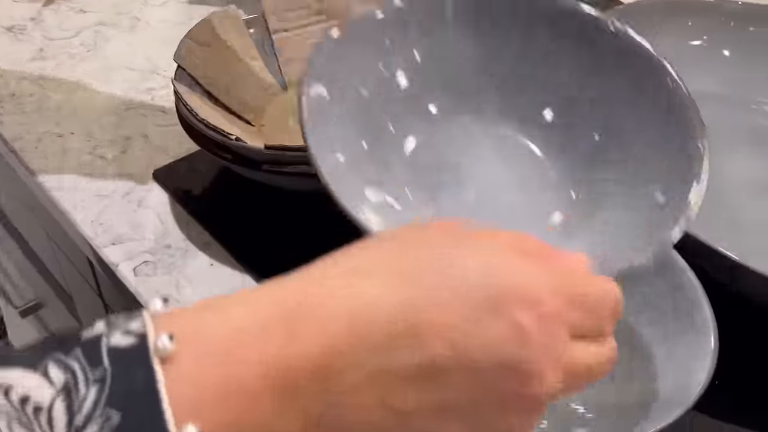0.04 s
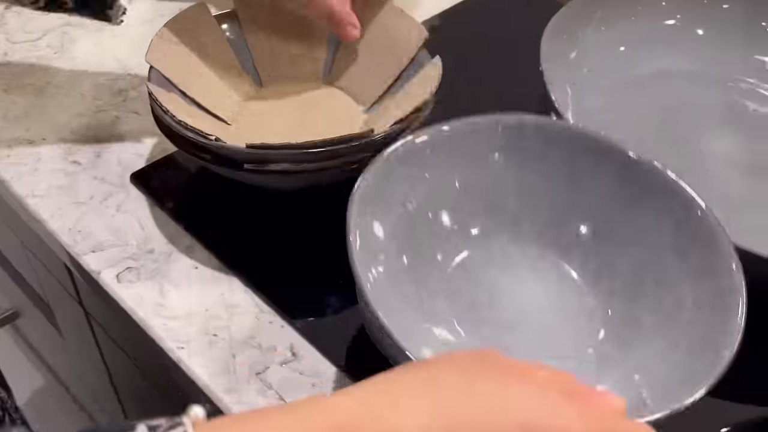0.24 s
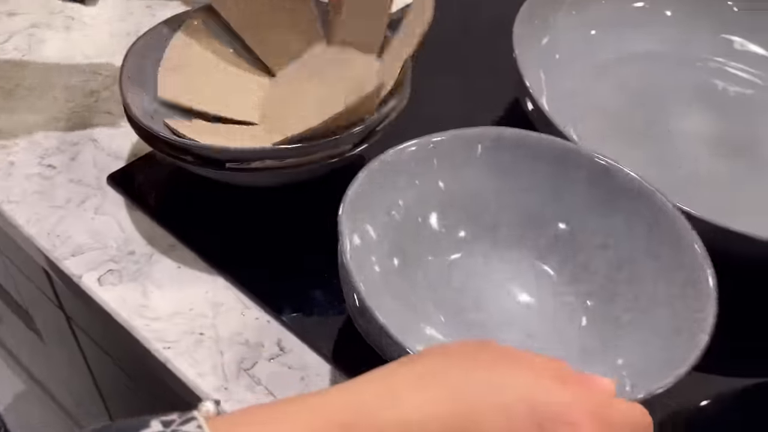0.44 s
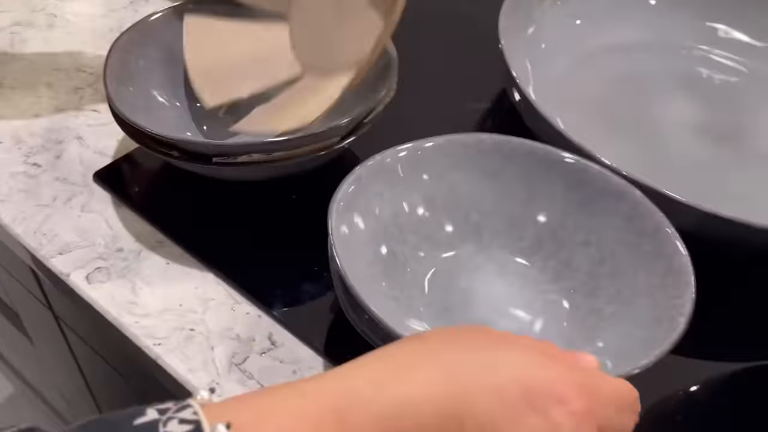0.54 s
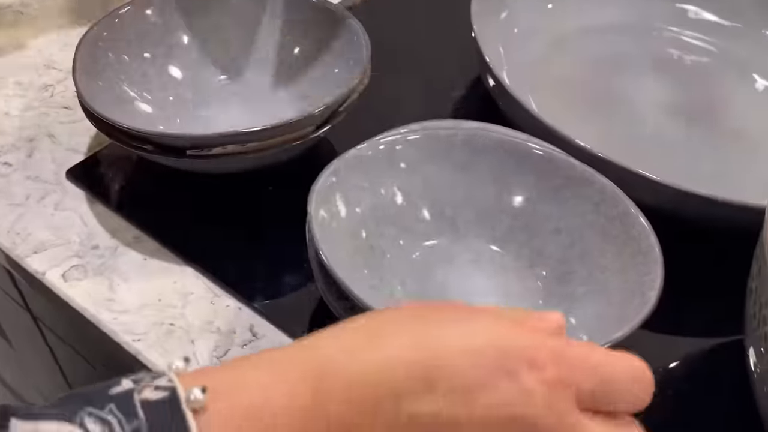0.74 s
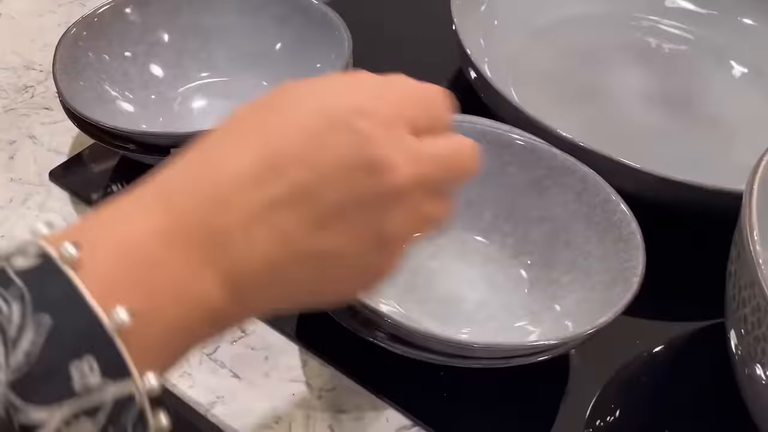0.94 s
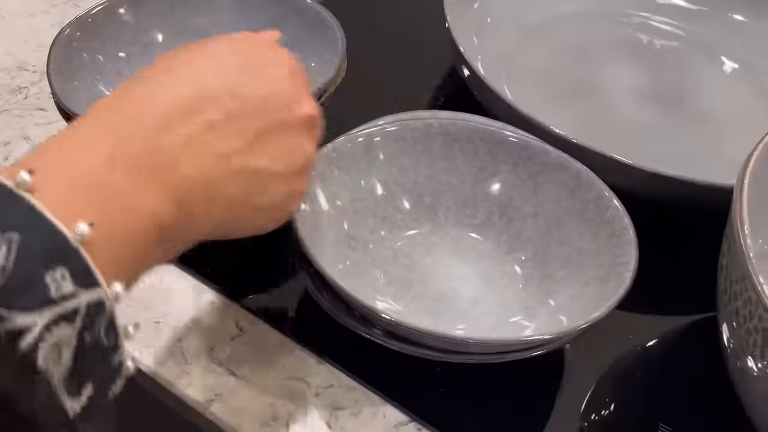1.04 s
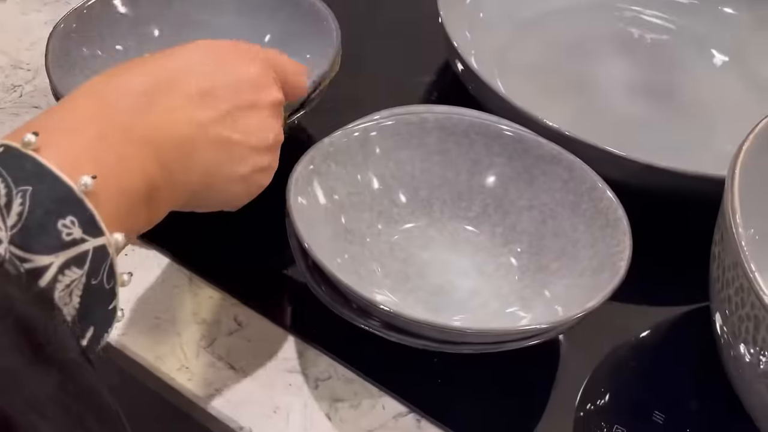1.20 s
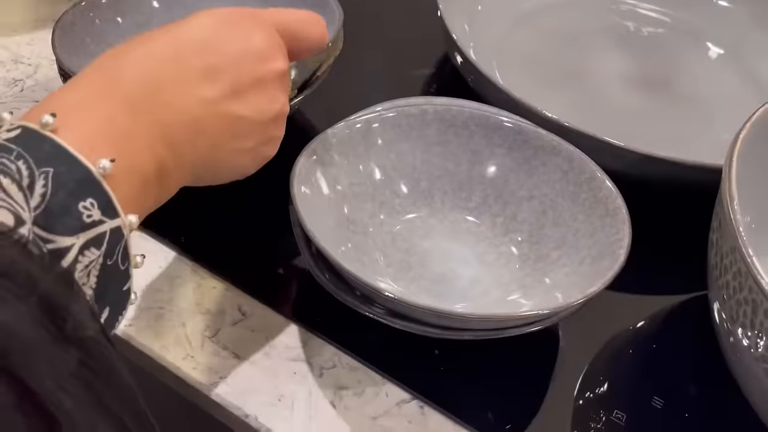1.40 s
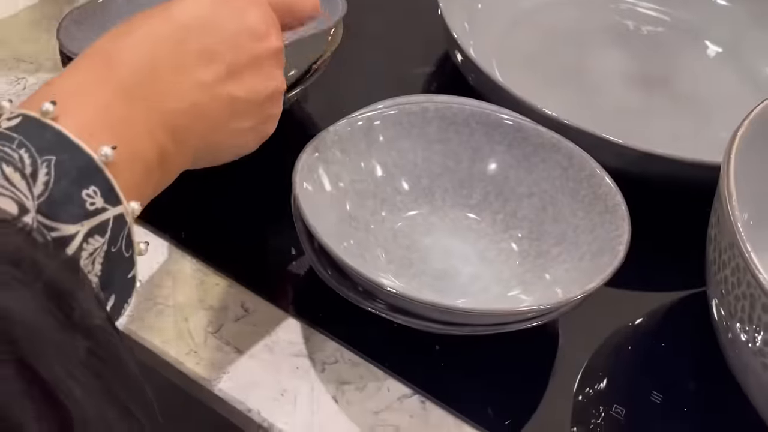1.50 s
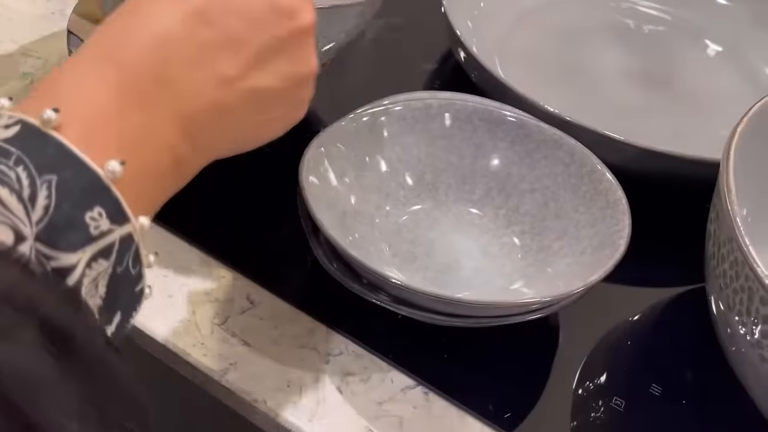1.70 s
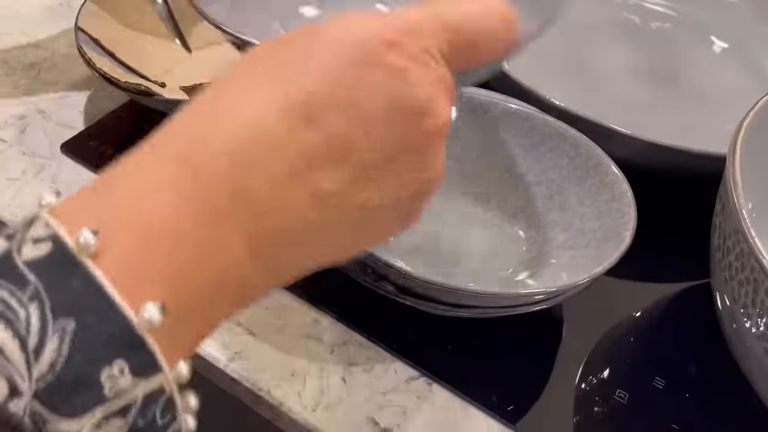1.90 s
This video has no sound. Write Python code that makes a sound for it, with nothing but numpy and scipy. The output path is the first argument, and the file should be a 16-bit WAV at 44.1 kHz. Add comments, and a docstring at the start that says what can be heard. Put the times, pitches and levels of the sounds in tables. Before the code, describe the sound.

A stoneware bowl clinks sharply into another, then knocks down with a hollow clonk in a live kitchen.

```python
"""In a live kitchen, a stoneware bowl is set into another on a glass hob: it clinks, rocks, and drops home
with a second clink and a clonk. The hand lets go, slides a cardboard separator about and brushes a bowl
of the next stack, which rings softly. Bowls are fading sine waves plus noise cracks, the hob is filtered
pulses, hands and cardboard are grainy noise, and the kitchen is a decaying noise echo.
The recorder's limiter ducks on the two loud clinks and lets the room swell back."""
import sys
import numpy as np
from scipy import signal
from scipy.fft import rfft, irfft
from scipy.io import wavfile
from scipy.ndimage import uniform_filter1d, minimum_filter1d

SR = 44100
rng = np.random.default_rng(int(sys.argv[2]) if len(sys.argv) > 2 else 0)


def inscribe(sig):
    """Save sig as 16-bit PCM at rate SR to the path in sys.argv[1].

    A 1-D sig is mono; a 2-D sig holds one channel per row.
    Samples are clipped to [-1, 1] before scaling.
    """
    pcm = np.round(np.clip(np.atleast_2d(sig).T, -1, 1) * 32767)
    wavfile.write(sys.argv[1], SR, pcm.astype(np.int16))


N = 85995

# In all tables, "fade time" means the seconds a sound takes to fall by 60 dB.
# Steady room tone. Each row: frequency in Hz, level in dB.
ROOM_TONE = [(20, -13), (60, 3), (130, -7), (400, -17), (800, -19), (1400, -37.5), (3000, -46), (7000, -56),
             (14000, -55)]
# Fingers and cardboard rub. Each row: start in seconds, length in seconds, level in dB,
# tilt in dB per octave above 500 Hz, attack time constant in seconds.
RUBS = [(0.059, 0.39, -54.5, -17, 0.019), (0.167, 0.065, -50.5, -4, 0.001),
        (.239, 0.011, -22.5, -2.5, 0.012), (0.352, 0.1, -34, -7, 0.003),
        (0.886, 0.0072, -39.5, -2.5, 0.0029), (0.906, 0.28, -60, -0.5, .004),
        (1.168, 0.036, -58, -2.5, 0.0065), (1.206, 0.0037, -47, 0, 0.0008), (1.215, 0.063, -58, -5, 0.0063),
        (1.279, 0.13, -51.5, -4, 0.041), (1.424, 0.0082, -44, -3.5, 0.004),
        (1.436, 0.083, -54.5, -7.5, 0.004), (1.601, 0.04, -58, 11, 0.0081),
        (1.742, 0.051, -54.5, -3, 0.0019)]
# Colour of the rubbing. Each row: frequency in Hz, level in dB.
RUB_COLOUR = [(200, -3), (800, -2.5), (3500, -3), (6500, 0), (8500, -12.5), (11500, 4), (13500, -4),
              (16000, -30.5)]
# Kitchen reverberation. Each row: frequency in Hz, level in dB, fade time in seconds.
KITCHEN_BANDS = [(70, -20.5, 5.9), (207, -26.5, 1.9), (426, -11, 0.9), (835, -18.5, 0.88),
                 (1650, -15, 0.93), (2930, -15.5, 0.76), (5500, -11.5, 0.7), (7900, -10, 0.25),
                 (13300, -29.5, 1.2)]
# Short damped notes as the foot seats and the rims touch.
# Each row: start in seconds, level of the main note in dB, its frequency in Hz, fade time in seconds.
CLONKS = [(0.062, -39.5, 560, 0.038), (.089, -39, 610, 0.028), (.171, -44.5, 768, 0.27),
          (0.4717, -27, 3000, 0.019), (.556, -8, 3125, 0.034), (0.56, 11.5, 880, 0.036),
          (.573, -5.5, 790, 0.023), (.580, -16, 885, 0.076), (.602, -14.5, 3140, 0.03),
          (.610, -13.5, 857, 0.042), (0.897, -25, 472, 0.09), (1.141, -32, 465, 0.031),
          (1.154, -40.5, 470, 0.078)]
# Dull bumps of handling. Each row: start in seconds, length in seconds, level in dB, centre in Hz.
BUMPS = [(0.069, 0.16, -47.5, 60), (0.169, 0.074, -51, 174), (0.536, 0.14, -32, 80.5),
         (0.537, 0.056, -16, 277), (0.798, 0.17, -53, 60.4), (1.154, 0.18, -56, 227),
         (1.367, 0.08, -41.5, 383), (1.488, 0.0557, -48, 353.5), (1.859, 0.041, -47.5, 288)]
# Ring of the bowl while it is held.
# Each row: frequency in Hz, level in dB, fade time in seconds, left minus right in dB.
HELD_BOWL = [(920, 3, .06, 0), (1013, -6, .07, 0), (1305, -5, .06, 0), (1715, -9, .08, -3),
             (2500, -9, .05, 4), (2960, -7, .05, 4), (4082, -8, .08, 4), (4224, 1, .07, 6),
             (4490, -10, .06, 6), (5356, -11, .07, 1), (5998, -6, .08, 4), (8560, -13, .08, 0),
             (9690, -11, .06, 1), (10740, -5, .09, 0), (10848, -6, .09, 0), (12150, -5, .07, 0)]
# Ring of the two bowls nested.
# Each row: frequency in Hz, level in dB, fade time in seconds, left minus right in dB.
NESTED_BOWLS = [(785, -15, .3, 0), (840, -22, .6, 0), (879, -15, .4, 1), (1000, -34, .9, 0),
                (1793, -9, .05, -5), (2460, -8, .05, 3), (2763, -6, .11, 2), (3187, -8, .05, 3),
                (3570, -7, .03, 7), (4086, 1.5, .11, 2), (4900, -4, .025, 4), (6040, -9, .08, 2),
                (7560, -19, .07, 0), (10010, -17, .07, 0), (10880, -4, .06, 0), (11900, -15, .07, 0)]
# Ring of a bowl on the far stack.
# Each row: frequency in Hz, level in dB, fade time in seconds, left minus right in dB.
FAR_BOWL = [(518, -11, 1.5, -3), (1615, -18, .7, 7), (2755, 1, .11, 5), (4160, -18, 1.3, -3),
            (5770, -3, .075, 1)]
# Glaze meets glaze. Each row: start in seconds, ring level in dB, crack level in dB,
# treble limit of the contact in Hz, bowl number (0 held, 1 nested, 2 far).
CLINKS = [(0.1696, -52, -49, 14850, 0), (0.216, -62, -55.5, 15000, 0), (0.2477, 0.5, -2, 14500, 0),
          (0.2508, -15, 0, 12000, 0), (0.2538, -13.5, -6.5, 12400, 0), (.258, -13, 2, 16000, 0),
          (0.329, -43, -24, 2000, 0), (.471, -37, -16.5, 1900, 1), (.5338, -18.5, 3.5, 12000, 1),
          (0.5364, -22, -4, 9000, 1), (0.5398, -3, -3.5, 11000, 1), (.556, -17.5, -1.5, 6520, 1),
          (0.57, -17.5, -11, 4967, 1), (0.603, -33, -35.5, 3540, 1), (1.7435, -57, -50.5, 14630, 2),
          (1.752, -64, -47, 8880, 2), (1.766, -59.5, -59.5, 7060, 2), (1.780, -47.5, -54, 7310, 2),
          (1.841, -62, -47, 1700, 2), (1.863, -54, -59, 1700, 2)]
# Colour of the crack. Each row: frequency in Hz, level in dB.
CRACK_COLOUR = [(150, -8), (400, -3.5), (1200, -1.5), (2600, -2), (5000, -6.5), (6200, -6.5), (6900, -18.5),
                (8000, -20.5), (10000, -7.5), (12400, -9), (14000, -20), (16500, -38.5)]
# The stack knocks on the hob.
# Each row: start in seconds, peak of the first pulse in dB, centre in Hz, width in octaves.
KNOCKS = [(0.2467, 4.5, 1240, 0.65), (0.2489, 7, 286, 0.83), (0.3268, -4, 640, 0.46), (.330, -4, 255, 0.86),
          (0.4699, -12, 1020, 0.27), (.472, -11, 261, 0.79), (0.5344, 7.5, 272, 0.87),
          (0.5587, 3, 950, 1.7), (0.607, -12, 345, 2.4), (0.909, -28, 223, 0.65),
          (0.927, -31.5, 277.4, 0.66), (0.981, -39, 241, 0.41), (1.139, -36, 350, 0.63),
          (1.359, -24.5, 562, 0.75), (1.368, -25, 406, 0.96), (1.398, -35, 373, 0.44),
          (1.416, -40, 503.5, 1), (1.487, -32, 353.8, 0.71), (1.799, -39, 305, 0.75),
          (1.863, -48.5, 1320, 0.26), (1.863, -38.5, 316.4, 0.56)]
# Body of the hob. Each row: frequency in Hz, level in dB.
HOB_BODY = [(60, -18), (130, 3), (185, 4), (240, 5.5), (310, 3.5), (450, 2), (560, -6.5), (720, 3),
            (1050, -1), (1400, 1.5), (1700, 2), (3000, -16), (4500, -22), (9000, -46.5)]
# Returns from the rim of the plate. Each row: delay in seconds, level in dB.
EDGE_ECHOES = [(.0043, -22.5), (0.011, -21)]
# The cardboard's edge slides. Each row: start in seconds, length in seconds, level in dB, centre in Hz.
SLIDES = [(1.269, 0.086, -61.5, 4500), (1.327, 0.088, -57, 4150)]
# Balance between the microphones. Each row: frequency in Hz, left minus right in dB.
BALANCE = [(120, 0.5), (250, 0.5), (500, 3), (1200, -0.5), (2600, 3), (5000, 0.5), (7000, 0.5)]

ROOM_TONE_DB = -55
RUB_RELEASE_S = 0.0044  # time constant
FINE_GRAIN_DB, FINE_GRAIN_S = 2.4, 0.002
SCRAPE_DB, SCRAPE_S = 3, 0.016
CRACKLES_PER_S, CRACKLE_DB = 130, -7
ROOM_BUILD_S, ROOM_SPREAD = 0.0014, 0.93
EARLY_DB, EARLY_T60_S = -6, 0.15
RING_ROOM_DB = -5  # the rim's ring is aimed at the microphones, so less of it fills the room
CONTACT_RISE_S = 0.00029  # time constant
CLONK_PAIR_RATIO, CLONK_PAIR_DB = 0.85, -6.5  # second note against the main one
BUMP_OCTAVES, SLIDE_OCTAVES = 0.4, 0.35  # widths of the noise bands
CRACK_SPREAD, CRACK_T60_S = 0.38, 0.03
MINOR_MODES_DB, MINOR_MEAN_T60_S = -8.5, 0.02  # the crowd of weak overtones that the crack leaves behind
MEAN_LOBE_TURNS = 0.12  # average step between the sides, in cycles, from 4 to 7 kHz
BEND_DELAY_S = 0.005073  # delay of the hob's bending waves at 300 Hz
HOB_T60_S, HOB_RING_DB = 0.043, -3.5
LEFT_LEAD_S = 0.000026
OVERLOAD = 6.4  # level at which the input rounds off
CEILING, RELEASE_DB_PER_S, LOOKAHEAD_S = 0.92, 40, 0.0012
TOP_HZ = 16500

T = np.arange(N) / SR
HZ = np.maximum(np.fft.rfftfreq(N, 1 / SR), 1)


def amp(db):
    """Turn decibels into gain."""
    return 10 ** (np.asarray(db) / 20)


def unit(x):
    """Scale to an rms (average strength) of 1."""
    return x / np.sqrt(np.mean(x ** 2))


def colour(points):
    """Draw a smooth gain curve through (Hz, dB) points."""
    p = np.array(points)
    return amp(np.interp(np.log(HZ), np.log(p[:, 0]), p[:, 1]))


def octave_bump(hz, octaves):
    """Gain that peaks at one frequency and falls off on both sides."""
    return np.exp(-.5 * (np.log2(HZ / hz) / octaves) ** 2)


def noise(gain, spread):
    """Coloured stereo hiss; spread is the share that differs between sides, smaller in the bass."""
    mid, side = rfft(rng.standard_normal((2, N)))
    side = side * spread * np.clip(HZ / 1500, .35, 1)
    return unit(irfft(np.array([mid + side, mid - side]) * gain, N))


def fade(t60):
    """Exponential decay that falls by 60 dB in t60 seconds."""
    return np.exp(-np.log(1000) * T / t60)


def rise(time_s):
    """Smooth start from silence."""
    return 1 - np.exp(-T / time_s)


def swell(length):
    """Half a sine wave: up and down once within the length."""
    return np.sin(np.pi * np.minimum(T / length, 1))


def at(x, start):
    """Delay a sound to its start time."""
    k = max(int(start * SR), 0)
    return np.pad(x, ((0, 0), (k, 0)))[:, :N]


def convolve(x, response):
    """Pass a sound through a response."""
    return signal.fftconvolve(x, response, axes=-1)[:, :N]


def room_tone():
    """Steady, mostly low noise of the kitchen."""
    return amp(ROOM_TONE_DB) * noise(colour(ROOM_TONE), 0.96)


def wander(smooth_s):
    """Random drift of typical size 1, smoothed over smooth_s seconds."""
    return unit(uniform_filter1d(rng.standard_normal(N), max(int(smooth_s * SR), 1)))


def friction(gain):
    """Coloured hiss that catches and slips, with small crackles of fibres."""
    snaps = (rng.random(N) < CRACKLES_PER_S / SR) * rng.standard_normal(N)
    crackle = unit(irfft(rfft(snaps) * gain, N))
    grip_db = FINE_GRAIN_DB * wander(FINE_GRAIN_S) + SCRAPE_DB * wander(SCRAPE_S)
    return noise(gain, 0.92) * unit(amp(grip_db)) + amp(CRACKLE_DB) * crackle


def rubs():
    """Grainy friction of fingers and cardboard that swells, holds and dies away."""
    out = 0
    for start, length, db, tilt_db, attack in RUBS:
        release = np.exp(-np.maximum(T - length, 0) / RUB_RELEASE_S)
        tilt = amp(tilt_db * np.log2(np.maximum(HZ, 500) / 500))
        rub = friction(colour(RUB_COLOUR) * tilt) * rise(attack) * release
        out = out + at(amp(db) * rub, start)
    return out


def kitchen(x):
    """Quick reflections from the counter and a long tail whose bands each fade at their own pace."""
    hz, db, t60 = np.array(KITCHEN_BANDS).T
    wash = rfft(noise(1, ROOM_SPREAD))
    tail = 0
    for k, share in enumerate(np.eye(len(hz))):
        # each band blends into its neighbours
        band = irfft(wash * np.interp(np.log(HZ), np.log(hz), share), N)
        decay = fade(t60[k])
        tail = tail + amp(db[k]) * band * decay / np.linalg.norm(decay)
    early_decay = fade(EARLY_T60_S)
    early = amp(EARLY_DB) * noise(1, ROOM_SPREAD) * early_decay / np.linalg.norm(early_decay)
    return convolve(x, (tail + early) * rise(ROOM_BUILD_S))


def clonks():
    """Each seating sounds a close pair of quickly damped hollow notes."""
    out = 0
    for start, db, hz, t60 in CLONKS:
        main = np.sin(2 * np.pi * hz * T)
        partner = amp(CLONK_PAIR_DB) * np.sin(2 * np.pi * hz * CLONK_PAIR_RATIO * T)
        note = fade(t60) * (main + partner) * rise(CONTACT_RISE_S)
        out = out + at(amp(db) * note[None], start)
    return out


def bumps():
    """Handling gives soft swells of low rumble."""
    out = 0
    for start, length, db, hz in BUMPS:
        rumble = noise(octave_bump(hz, BUMP_OCTAVES), 0.24)
        out = out + at(amp(db) * rumble * np.sqrt(np.maximum(swell(length), 0)), start)
    return out


def ring(modes):
    """A bowl vibrates in many fading notes, each starting anywhere in its cycle."""
    sides = np.array([[.5], [-.5]])  # left, right
    out = 0
    for (hz, db, t60, pan_db), (turn, lobe) in zip(modes, rng.random((len(modes), 2))):
        # the sides are a little out of step, less in the bass and not at all from 7 kHz up
        skew = MEAN_LOBE_TURNS * 2 * lobe * min(hz / 4000, 1) * (hz < 7000)
        wave = np.sin(2 * np.pi * (hz * T + turn + skew * sides))
        out = out + amp(db + pan_db * sides) * fade(t60) * wave
    return out


def minor_modes(count=240):
    """Weak overtones at random pitches, more crowded lower down, each with its own decay and side."""
    place, life, side = rng.random((count, 3)).T
    hz = 700 + 13500 * place ** 1.5
    gain = np.interp(hz, HZ, colour(CRACK_COLOUR))
    size = SR // 4
    t = T[:size]
    t60 = MINOR_MEAN_T60_S * (.5 + life[:, None])
    decay = np.exp(-np.log(1000) * t / t60)
    waves = decay * np.sin(2 * np.pi * (hz[:, None] * t + rng.random((count, 1))))
    side_gains = gain * np.array([.5 + side, 1.5 - side])
    both = side_gains @ waves / np.sqrt(np.sum(gain ** 2) / 2)
    return np.pad(both, ((0, 0), (0, N - size)))


def clinks():
    """Each contact gives a short crack and a bowl's ring, both treble-limited. Returns (cracks, rings)."""
    bowls = [(modes, minor_modes()) for modes in (HELD_BOWL, NESTED_BOWLS, FAR_BOWL)]
    cracks, rings = 0, 0
    for start, ring_db, crack_db, top_hz, bowl in CLINKS:
        modes, minor = bowls[int(round(bowl))]
        crack = noise(colour(CRACK_COLOUR), CRACK_SPREAD) * fade(CRACK_T60_S)
        crack = crack + amp(MINOR_MODES_DB) * minor
        contact = signal.butter(2, min(top_hz, TOP_HZ), fs=SR)

        def strike(x):
            """Soften the start and the treble as the contact does."""
            # the tiny offset keeps the filter away from extremely small numbers
            return at(signal.lfilter(*contact, x * rise(CONTACT_RISE_S) + 1e-18), start)

        cracks = cracks + amp(crack_db) * strike(crack)
        rings = rings + amp(ring_db) * strike(ring(modes))
    return cracks, rings


def knocks():
    """Bending waves in the hob bring the highs first, return from its edges and ring on briefly."""
    paths = 1 + sum(amp(db) * np.exp(-2j * np.pi * HZ * lag) for lag, db in EDGE_ECHOES)
    # this phase makes the delay shrink with the square root of frequency
    bend = paths * np.exp(-4j * np.pi * BEND_DELAY_S * np.sqrt(300 * HZ))
    dulling = amp(-4 * np.log2(np.maximum(HZ, 300) / 300))
    out = 0
    for start, db, hz, octaves in KNOCKS:
        shape = colour(HOB_BODY) * octave_bump(hz, octaves)
        pulse = irfft(shape * bend, N) * (T < .1)
        plate = noise(shape * dulling, 0.12) * fade(HOB_T60_S) * rise(BEND_DELAY_S)
        knock = pulse / np.abs(pulse).max() + amp(HOB_RING_DB) * plate
        out = out + at(amp(db) * knock, start)
    return out


def slides():
    """The edge of the cardboard rasps over the glaze in a narrow band."""
    out = 0
    for start, length, db, hz in SLIDES:
        rasp = friction(octave_bump(hz, SLIDE_OCTAVES)) * swell(length)
        out = out + at(amp(db) * rasp, start)
    return out


def scene():
    """Crockery in the kitchen, reaching the left microphone slightly first, over the room tone."""
    cracks, rings = clinks()
    handling = rubs() + clonks() + cracks + knocks() + slides()
    room = kitchen(handling + amp(RING_ROOM_DB) * rings)
    lean = np.sqrt(colour(BALANCE))  # half the level difference goes to each side
    late_right = np.exp(-2j * np.pi * HZ * LEFT_LEAD_S)
    microphones = np.array([lean, late_right / lean])
    crockery = irfft(rfft(handling + rings + room) * microphones, N)
    return crockery + bumps() + room_tone()


def record(dry):
    """The input rounds the hardest peaks, a look-ahead limiter ducks and slowly releases, the top is cut."""
    x = OVERLOAD * np.tanh(dry / OVERLOAD)
    over_db = 20 * np.log10(np.maximum(np.abs(x).max(axis=0) / CEILING, 1))
    # hold the largest excess and let it shrink at a steady rate
    release_db = RELEASE_DB_PER_S * T
    duck_db = np.maximum.accumulate(over_db + release_db) - release_db
    size = max(int(LOOKAHEAD_S * SR), 1)
    gain = uniform_filter1d(minimum_filter1d(amp(-duck_db), size), size)
    top_cut = signal.ellip(8, .2, 80, TOP_HZ, fs=SR, output="sos")
    return signal.sosfilt(top_cut, x * gain)


dry = scene()
out = record(dry)
inscribe(out)
```